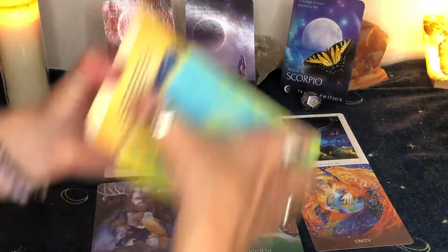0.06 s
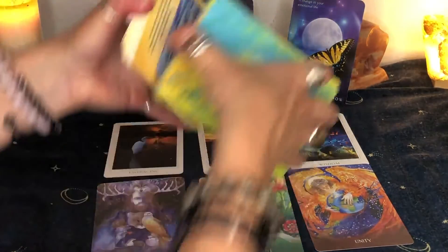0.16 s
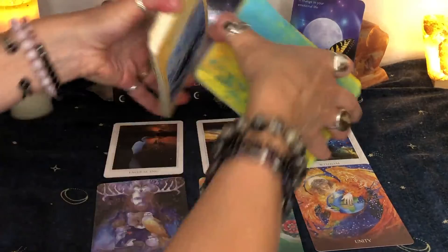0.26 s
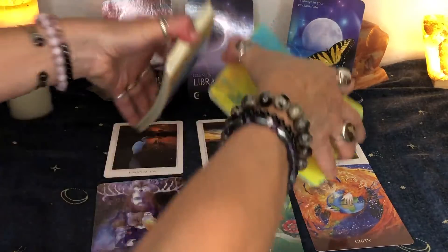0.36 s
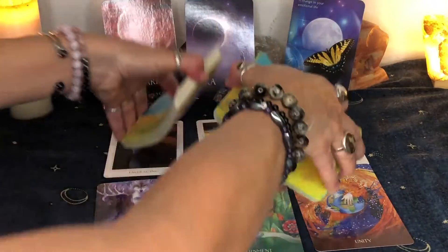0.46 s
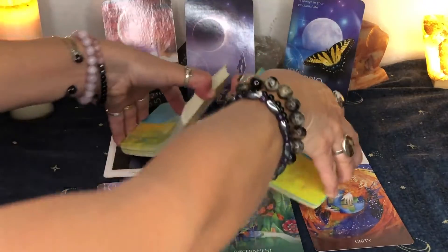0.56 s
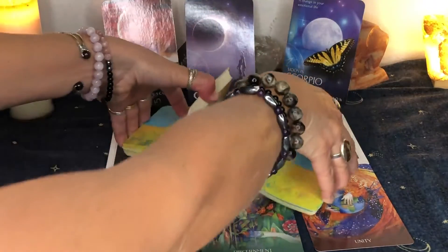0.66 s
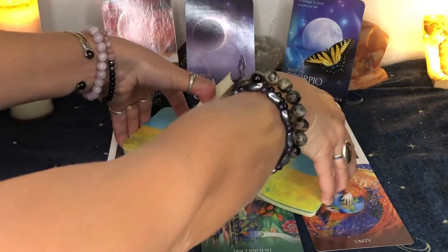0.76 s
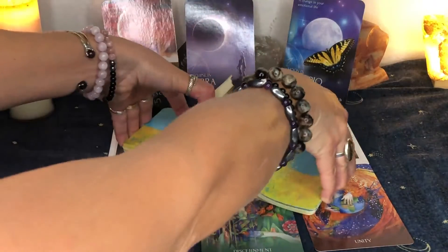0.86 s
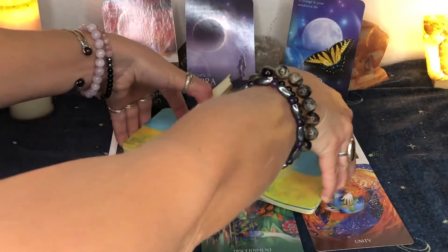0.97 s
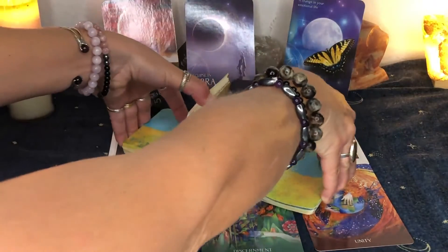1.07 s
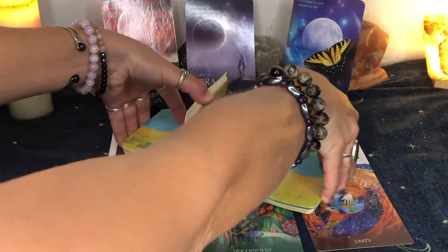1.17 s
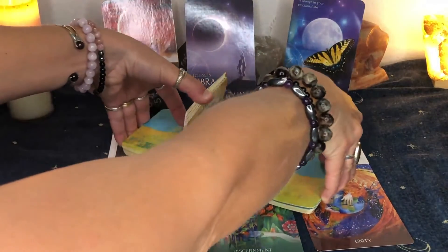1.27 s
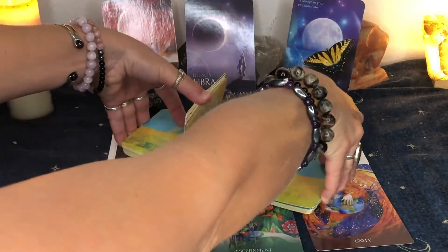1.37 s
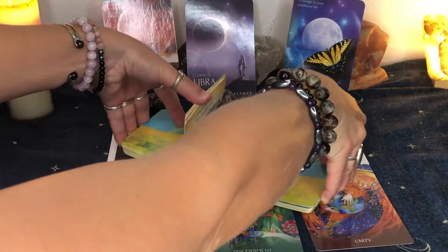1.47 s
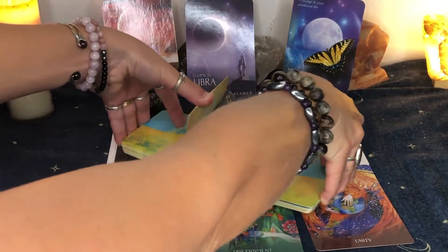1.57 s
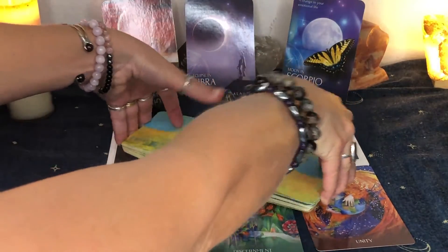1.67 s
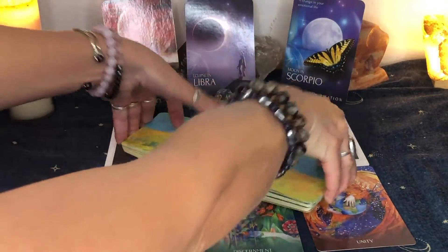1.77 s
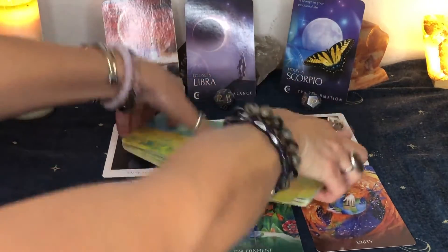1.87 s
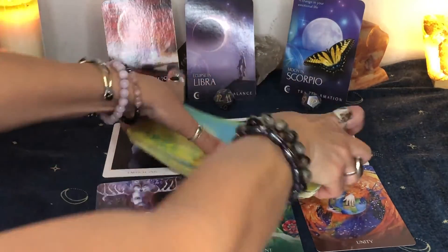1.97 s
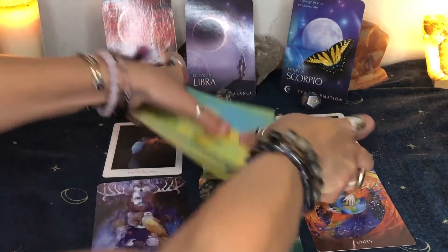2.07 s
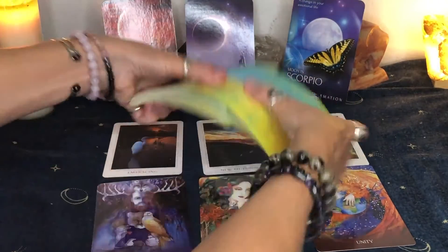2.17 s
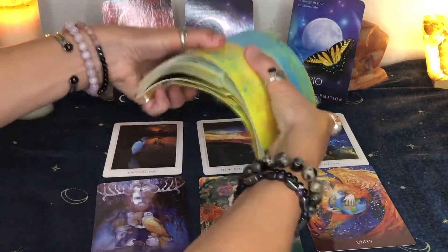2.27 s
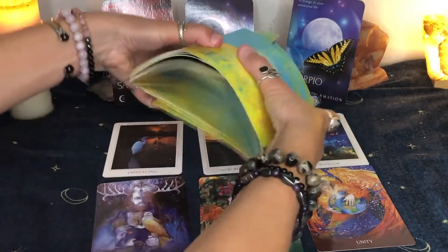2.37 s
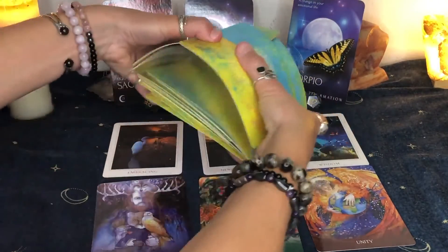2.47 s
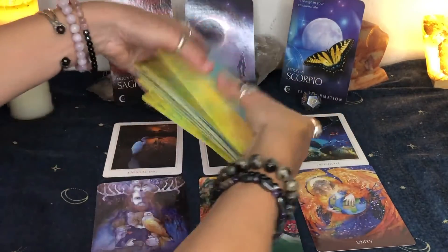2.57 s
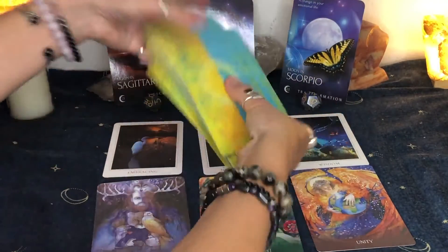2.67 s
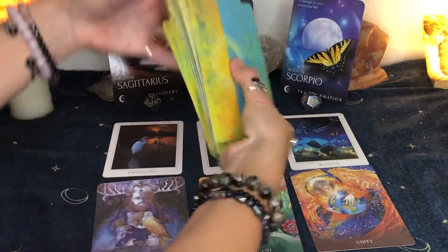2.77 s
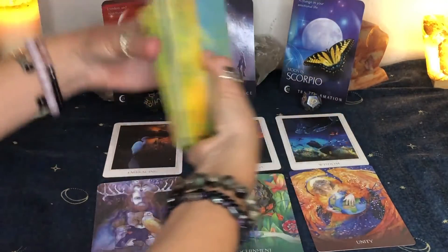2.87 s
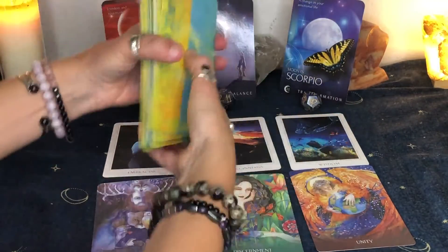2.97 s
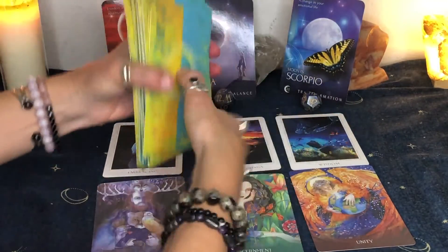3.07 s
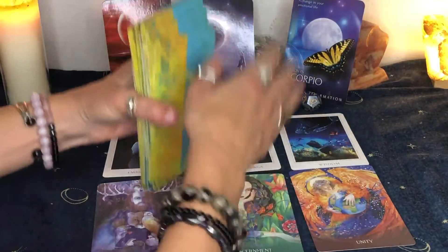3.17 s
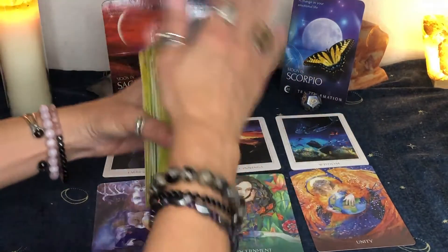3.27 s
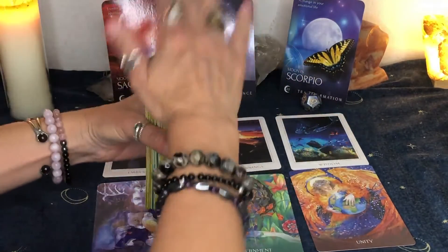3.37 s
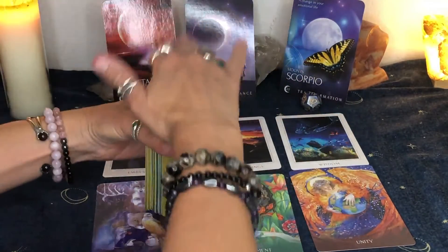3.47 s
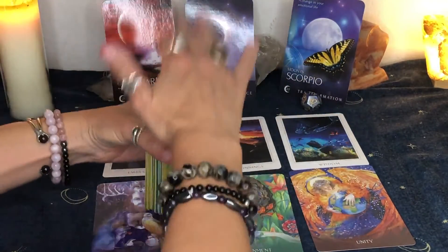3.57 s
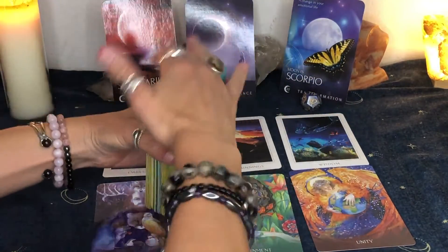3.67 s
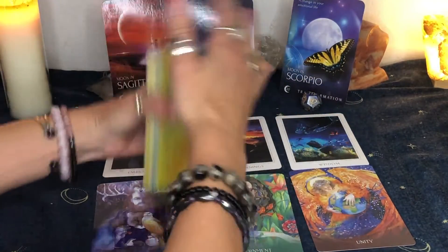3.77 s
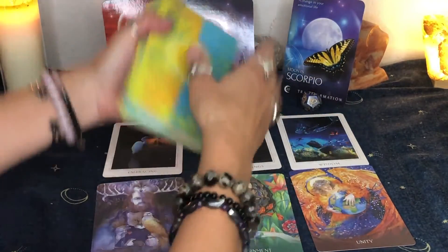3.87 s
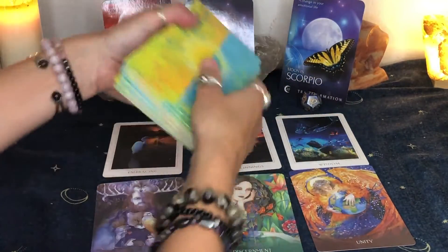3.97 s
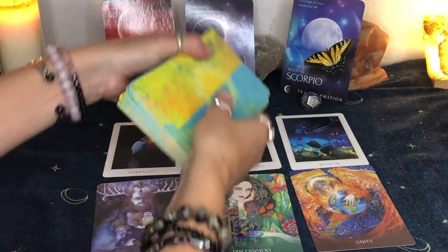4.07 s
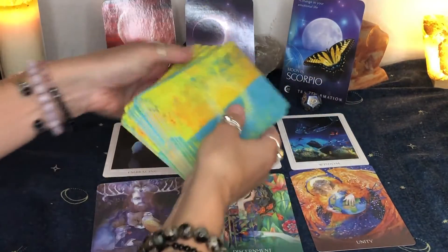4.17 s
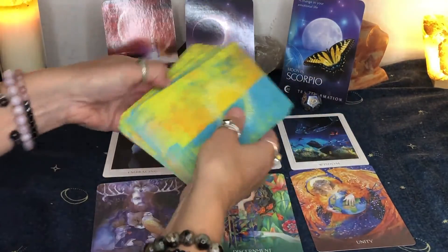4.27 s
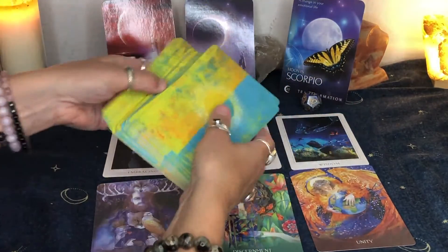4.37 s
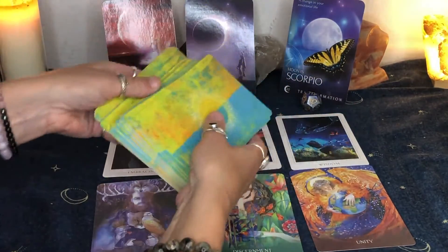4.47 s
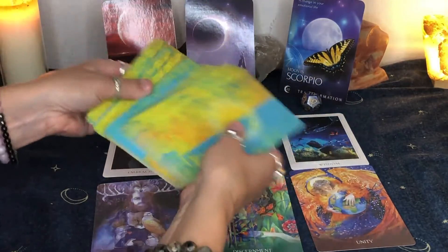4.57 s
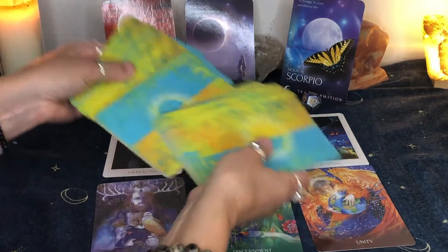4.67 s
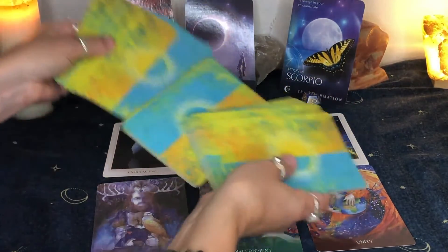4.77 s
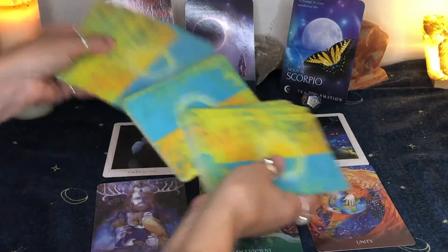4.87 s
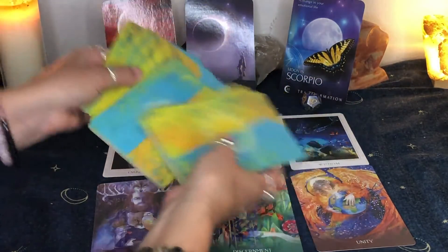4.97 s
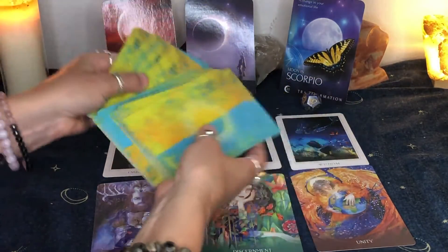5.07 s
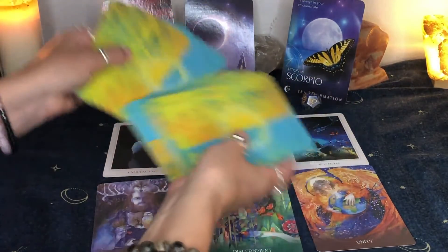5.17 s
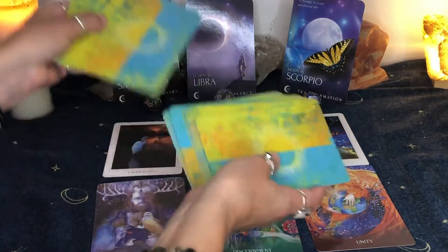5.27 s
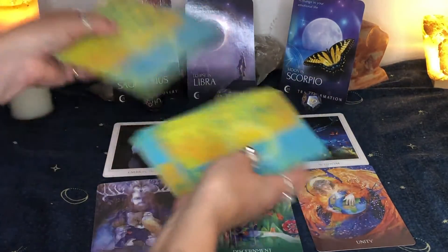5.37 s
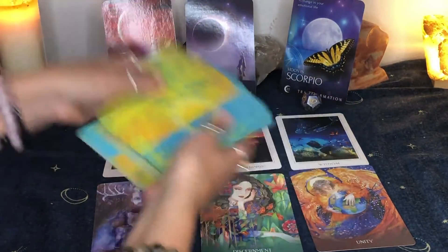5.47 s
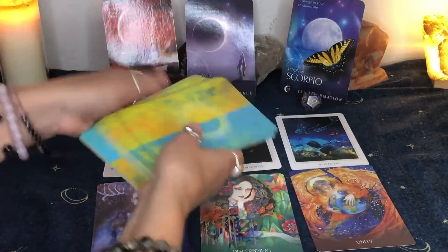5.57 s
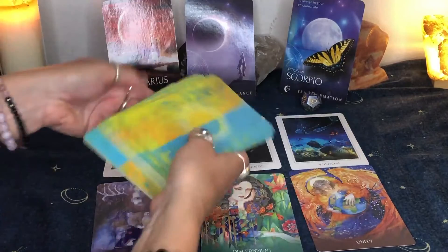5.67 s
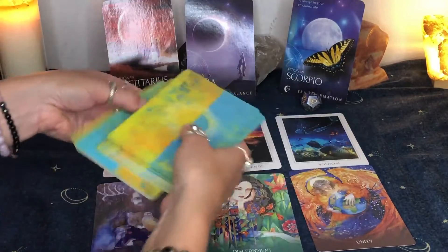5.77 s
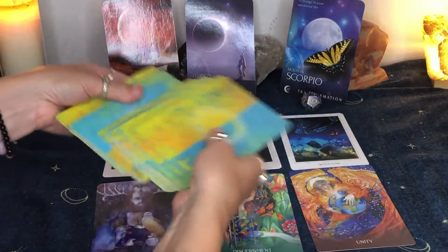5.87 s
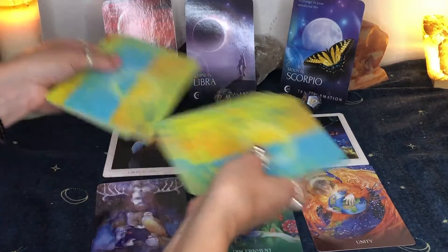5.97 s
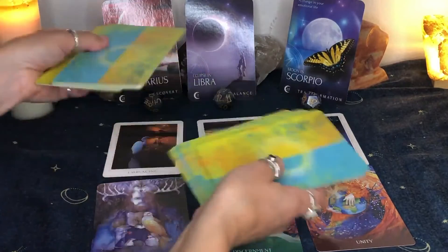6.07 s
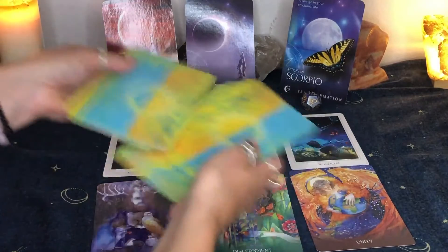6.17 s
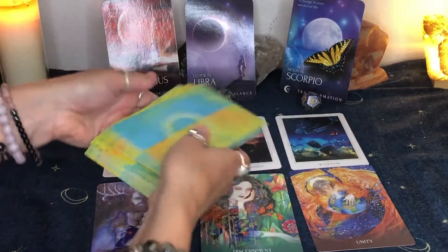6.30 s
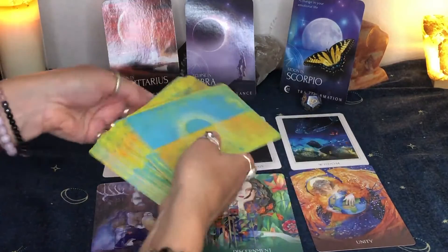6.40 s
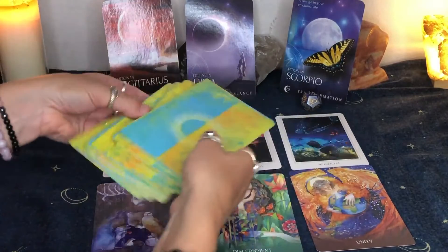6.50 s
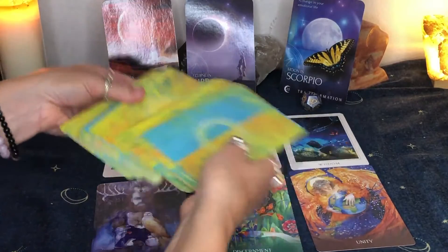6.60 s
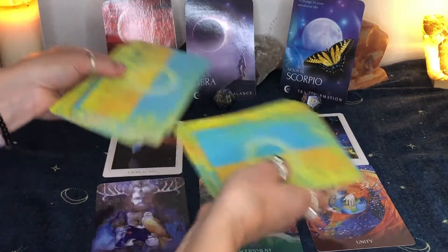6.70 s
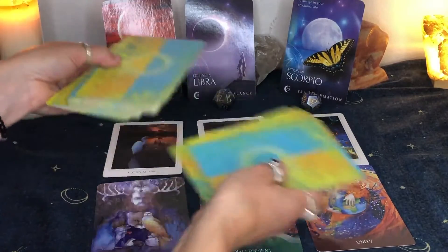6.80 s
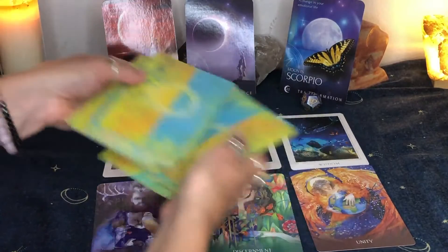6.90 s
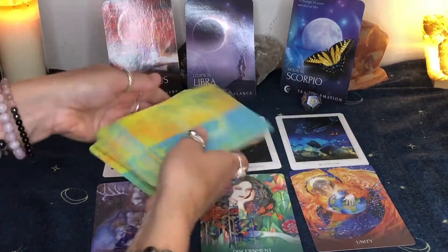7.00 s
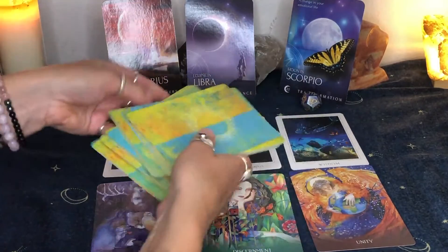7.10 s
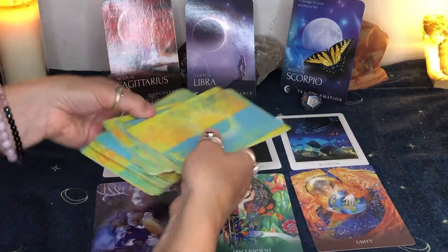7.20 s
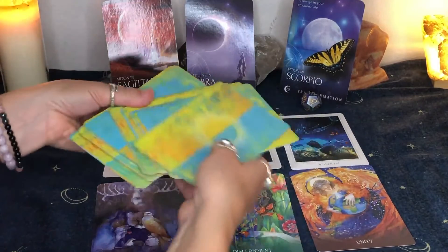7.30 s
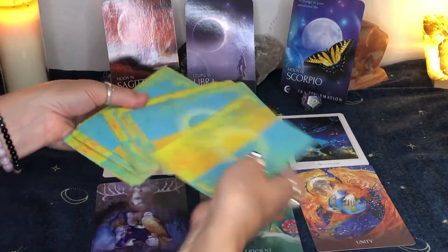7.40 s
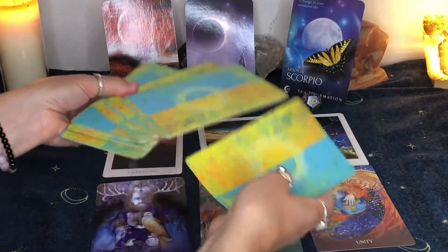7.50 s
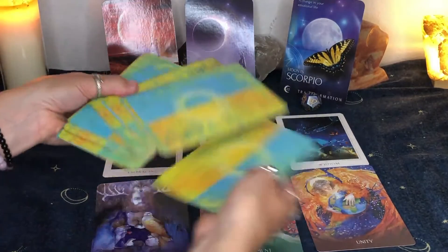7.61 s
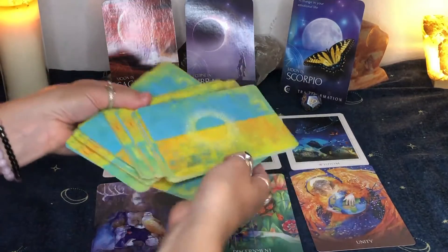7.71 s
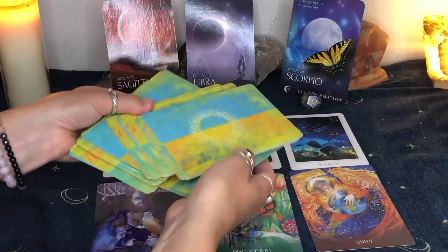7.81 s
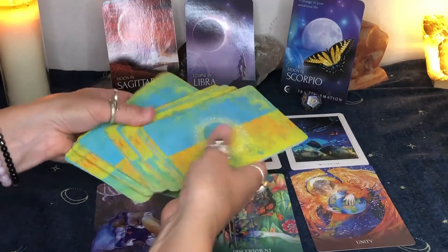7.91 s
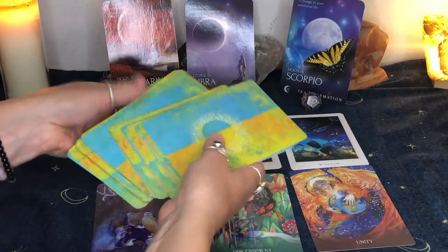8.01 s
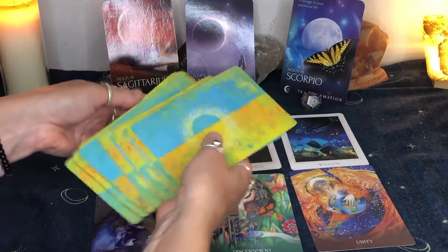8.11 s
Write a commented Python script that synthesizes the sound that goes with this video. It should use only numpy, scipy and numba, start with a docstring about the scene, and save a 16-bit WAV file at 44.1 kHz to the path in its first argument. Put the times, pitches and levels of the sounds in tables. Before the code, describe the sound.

A deck of large stiff cards is riffled in a rapid crackling burst, snapped square with a sharp slap, then shuffled with soft papery swishes indoors.

```python
"""Card edges snap and flap as a deck of large stiff cards is riffled, bridged, slapped square and shuffled.
Each snap is grainy noise that rings the deck and the air in the hands; a soft push thuds the table.
Between snaps, filtered noise makes the hiss, rubs, flutter, ticks and swishes of sliding cards.
A small soft room echoes the snaps; there is also a low rumble, a steady drone
and the dull murmur of air pushed by the cards."""
import sys
import numpy as np
from scipy import signal
from scipy.io import wavfile
from scipy.ndimage import uniform_filter1d
from numba import njit

SR = 44100
rng = np.random.default_rng(int(sys.argv[2]) if len(sys.argv) > 2 else 0)


def file_out(sig):
    """Save sig as 16-bit WAV at sys.argv[1]."""
    # one column per channel
    cols = np.atleast_2d(sig).T
    # limit, then scale
    lim = np.clip(cols, -1, 1)
    pcm = np.round(lim * 32767).astype(np.int16)
    wavfile.write(sys.argv[1], SR, pcm)


N = 359308  # length in samples

# All dB values are settings inside the mix, before the microphone.
# low rumble, and the dull murmur of air pushed by the cards: t/s, rumble level/dB, murmur level/dB
AIR_LEVELS = [(0.0, -38, -61), (0.04, -49.5, -68), (0.63, -45.5, -80), (1.07, -47.5, -50),
              (1.5, -41.5, -67), (1.66, -48.5, -75), (3.27, -51.5, -62.5), (3.45, -42.5, -58),
              (3.79, -49, -70.5), (4.27, -52, -60), (5.83, -49.5, -78), (6.31, -47.5, -71),
              (6.79, -45, -80.5), (8.15, -54, -81)]
# card faces sliding: t/s, hiss level/dB, flutter drive level/dB
SLIDE_LEVELS = [(0.0, -65, -62.5), (0.09, -98, -62), (0.22, -86, -67), (0.43, -82, -75), (0.72, -74.5, -71),
                (0.86, -72, -62), (1.02, -66, -61), (1.47, -61.5, -55.5), (1.66, -66.5, -67),
                (1.86, -70, -66.5), (2.13, -73.5, -64.5), (2.34, -50, -54), (2.43, -55.5, -54.5),
                (2.65, -68, -68), (3.49, -73, -64), (3.63, -80.5, -73.5), (3.88, -72, -74.5),
                (4.11, -71, -64), (4.54, -70, -66), (4.74, -66, -68.5), (5.24, -73.5, -71),
                (5.74, -71, -74.5), (6.13, -76, -70), (6.49, -70, -72), (6.83, -76, -75.5),
                (7.35, -68.5, -68), (7.78, -77, -70.5), (8.15, -66, -66)]
# a fingertip rubs along a card: middle t/s, level/dB, half length/s
FINGER_RUBS = [(0.121, -55.5, 0.13), (0.414, -70, .08), (2.12, -70, .03), (2.65, -55, .015),
               (4.59, -65, 0.042), (4.826, -61.5, 0.012), (5.996, -72, 0.066), (6.387, -77.5, .05),
               (6.703, -66.5, 0.044), (7.267, -74, .045), (7.553, -66, 0.032), (7.897, -66.5, 0.052),
               (8.103, -70.5, 0.057)]
# brief dips in the level of the sliding: middle t/s, level change/dB, half length/s
SLIDE_DIPS = [(.31, -7, 0.035), (.56, -2, .05), (2.02, -5.5, 0.033), (2.777, -4.5, 0.048), (3.224, -4, .04),
              (3.76, -6, .11), (5.347, -1, 0.026), (5.6, -1.5, .04), (6.06, -3, 0.038), (6.32, -4, .03),
              (6.805, -4, .05), (7.038, -1.5, .04), (7.174, -5.5, 0.02), (7.32, -5, 0.019),
              (7.61, -6, 0.013), (7.772, -4.5, 0.053), (7.98, -4, .02)]
# swishes of cards sliding or cascading together: peak t/s, level/dB, centre f/Hz, half length/s
CARD_SWISHES = [(0.14, -69.5, 4840, 0.17), (2.095, -56, 4970, 0.024), (2.212, -57, 7900, .03),
                (2.296, -43.5, 7300, 0.035), (2.388, -50, 7000, 0.055), (2.493, -46.5, 6300, 0.056),
                (2.957, -59, 4470, 0.038), (4.043, -67.5, 7060, .03), (4.22, -69.5, 8000, 0.049),
                (4.562, -62, 3220, 0.017), (4.41, -67, 11000, .008), (4.618, -69, 4020, .025),
                (4.69, -65, 8000, .03), (4.88, -63, 8000, 0.022), (4.97, -61, 5000, .02),
                (4.757, -51, 9300, 0.021), (4.933, -49.5, 8600, 0.016), (5.157, -50.5, 9400, 0.035),
                (5.312, -70, 8000, .02), (5.485, -51, 9000, 0.016), (5.857, -65.5, 4840, 0.018),
                (5.918, -60.5, 8040, 0.034), (6.252, -59, 8250, 0.025), (6.649, -49.5, 10030, 0.037),
                (6.932, -56.5, 7000, 0.037), (7.1, -69, 8800, .015), (7.36, -68, 5500, .02),
                (7.425, -52, 6050, 0.022), (7.672, -56.5, 4960, 0.03), (7.885, -59, 3870, 0.051),
                (8.039, -60.5, 3260, 0.028)]
# resonances of the deck: f/Hz, width/Hz, level/dB
DECK_MODES = [(533, 210, -1), (858, 130, 6.5), (1287, 412, 0), (2300, 760, -10), (3106, 900, -21),
              (4350, 320, -18)]
# resonances of the table: f/Hz, width/Hz, level/dB
TABLE_MODES = [(77, 22, -8.5), (135.6, 27, 1), (313.2, 75, 4.5)]
# how the deck is held from each time on:
# t/s, table push level re the flap drive/dB, air pocket level/dB, bright rasp level/dB
DECK_HOLDS = [(0, -21.5, 5, 0), (1.34, -16.5, 3, -1), (1.58, -17.5, 9, 3), (1.7, -7.5, 7, -5),
              (2.0, -19, 13, -3), (2.6, -18, 3, 2), (3.2, -9.5, 9.5, -17), (3.37, -14, 7, -5),
              (3.5, -6.5, 2, -2.5), (3.8, -25.5, 3.5, 6.5), (5.2, -24, 5.5, -1.5), (5.4, -19, 2, 4.5),
              (5.45, -25.5, 4, 5), (6.1, -22.5, 5.5, 6), (6.6, -28, 0, 2), (7.1, -20, 10, 0.5)]
# card edges snapping or landing:
# t/s, flap drive level/dB, air pocket f/Hz, scuff level re the flap drive/dB, scuff f/Hz, flap fade/s
EDGE_SNAPS = [(0.337, -70.5, 581, 11, 2890, 0.014), (0.675, -44.5, 1430, -9, 5030, 0.003),
              (0.696, -28.5, 1370, -13, 4380, 0.006), (0.772, -29.5, 1630, -6, 3930, 0.0069),
              (0.804, -25.5, 845, -20, 3890, 0.0055), (0.836, -35.5, 1370, -6, 3280, 0.008),
              (0.861, -16.5, 780, -15.5, 3900, 0.008), (0.871, -17.5, 910, -9, 4800, 0.0033),
              (0.954, -39, 880, -11, 7860, 0.0027), (0.977, -20.5, 840, -12, 3860, 0.0064),
              (1.024, -30, 1400, -13, 4250, 0.0061), (1.053, -21, 1380, -24, 4440, 0.0074),
              (1.063, -22.5, 1410, -4.5, 4470, 0.0056), (1.088, -21, 1200, -7.5, 4470, 0.004),
              (1.126, -44, 1420, -8, 3930, 0.017), (1.135, -15.5, 980, -4.5, 4100, 0.0053),
              (1.183, -24.5, 2100, -16.5, 7070, 0.012), (1.192, -20.5, 1350, -23, 4330, 0.0088),
              (1.257, -16, 810, -21.5, 4540, 0.0055), (1.325, -19.5, 790, -22, 3360, 0.0074),
              (1.353, -32.5, 830, -7, 4390, 0.0034), (1.368, -19, 820, -28, 3050, 0.0063),
              (1.38, -31, 1250, -9.5, 8600, 0.014), (1.393, -22, 800, -13, 2920, 0.008),
              (1.42, -18.5, 1250, -18, 4000, 0.0075), (1.485, -47, 1420, -15, 3710, 0.008),
              (1.502, -25.5, 923, -15.5, 7800, 0.0083), (1.509, -38, 1210, -2, 3960, 0.016),
              (1.526, -18.5, 1430, -15, 3540, 0.0097), (1.556, -23, 1320, -11, 3970, 0.0053),
              (1.574, -25, 859, -17.5, 5190, 0.01), (1.591, -24, 840, -12.5, 2600, 0.015),
              (1.612, -23.5, 1440, -12.5, 8200, 0.0089), (1.633, -27, 1350, -4.5, 4540, 0.0059),
              (1.786, -50.5, 1020, -8, 4950, 0.008), (1.803, -50.5, 1360, -12, 2690, 0.0092),
              (1.873, -48.5, 1280, -15, 6200, 0.016), (2.077, -57, 1810, 8, 6700, 0.0085),
              (2.128, -56.5, 1340, 1, 3170, 0.024), (2.228, -52, 1660, 3, 3500, 0.019),
              (2.344, -40.5, 1590, -3, 3230, 0.014), (2.365, -37.5, 676, -7.5, 6210, 0.013),
              (2.378, -27.5, 730, -12, 3150, 0.015), (2.395, -25.5, 810, -14, 5560, 0.011),
              (2.422, -19, 869, -14.5, 3460, 0.0063), (2.433, -34, 1510, -6, 3030, 0.013),
              (2.484, -36.5, 1530, -7, 7660, 0.0086), (2.497, -25.5, 686, -6, 2820, 0.0067),
              (2.518, -30.5, 821, -7, 5350, 0.011), (2.531, -32.5, 996, -8, 2900, 0.011),
              (2.546, -27, 790, -30, 3200, 0.0065), (2.618, -41.5, 810, -7.5, 2980, 0.011),
              (2.65, -52, 815, -6, 2800, 0.0027), (2.694, -60, 576, 3, 2790, 0.0038),
              (2.744, -58.5, 503, 10, 10600, 0.004), (2.943, -51.5, 538, 3, 4000, 0.0076),
              (3.028, -53, 501, -1.5, 5140, 0.0075), (3.061, -52, 732, -8, 6190, 0.0054),
              (3.097, -52, 560, -5.5, 3670, 0.0075), (3.278, -46, 660, 0, 2600, 0.0046),
              (3.302, -39, 729, 4.5, 3250, 0.0027), (3.336, -43.5, 815, 2, 4100, 0.0039),
              (3.351, -36, 1150, 8, 3420, 0.0047), (3.378, -32.5, 635, -3, 2600, 0.014),
              (3.397, -30, 1130, 7, 3900, 0.0044), (3.407, -8.5, 1230, -6, 3920, 0.0048),
              (3.412, -9, 710, -31, 3670, 0.0069), (3.58, -23, 636, -4, 3940, 0.004),
              (3.881, -53, 884, -4, 8250, 0.019), (4.227, -52.5, 670, -3.5, 9090, 0.015),
              (4.56, -50, 614, -15, 3780, 0.02), (4.819, -54.5, 851, -12, 2630, 0.0063),
              (4.922, -55, 1260, 4.5, 8690, 0.0093), (5.239, -40.5, 570, -3.5, 3720, 0.0057),
              (5.287, -52, 616, -15, 2750, 0.0072), (5.299, -58.5, 1010, -2.5, 8920, 0.0059),
              (5.392, -51, 853, -12, 3380, 0.0068), (5.412, -30.5, 821, -6, 3520, 0.0075),
              (5.461, -42, 840, -8, 3190, 0.015), (5.478, -40, 875, -4, 10300, 0.0095),
              (5.719, -53, 1220, -7, 3430, 0.01), (5.84, -47.5, 573, -9, 3730, 0.0099),
              (5.977, -46.5, 832, -12, 3680, 0.0092), (6.012, -46, 764, -23, 2600, 0.013),
              (6.157, -34, 594, -12, 4100, 0.011), (6.212, -44.5, 1240, -2.5, 9700, 0.0064),
              (6.237, -33.5, 840, -12.5, 2900, 0.012), (6.397, -54, 2340, -10, 2690, 0.0073),
              (6.422, -60, 511, -1, 2750, 0.0039), (6.693, -42, 800, 0, 3520, 0.0064),
              (6.859, -29.5, 815, -11, 2600, 0.0077), (6.876, -50, 2360, 8, 3340, 0.012),
              (6.932, -45.5, 820, -7.5, 3580, 0.015), (6.947, -42.5, 798, -16, 3600, 0.017),
              (7.092, -66.5, 501, 5.5, 8910, 0.0085), (7.148, -52.5, 817, -21.5, 3850, 0.0049),
              (7.25, -53, 833, -14.5, 9320, 0.017), (7.371, -55, 1470, -1, 3320, 0.018),
              (7.421, -45, 700, -12, 3490, 0.02), (7.459, -43, 2090, 0, 3000, 0.0066),
              (7.63, -41, 842, -17, 3380, 0.0042), (7.641, -39.5, 780, -12, 4190, 0.011)]

ROOM_T60_S, ROOM_DB, ROOM_HZ = 0.17, -16, 2500  # time to fade by 60 dB, echo level, echo bandwidth
TICKS_PER_S, TICK_S = 22, .0015  # average rate, fade time
TICK_DB, TICK_SPREAD_DB = 5, 2.5  # lowest drive re the hiss, average random extra
RUB_DB = -3.5  # steady rub re the mean of the hiss and flutter settings
HISS_HZ, HISS_WANDER_OCT = 6000, .15  # middle of the hiss, typical wander in octaves
SWISH_SHAPE = 1.46  # 2 = rounded bell, 1 = pointed with long skirts
SCUFF_LONGER = 1.044  # scuff fade time over flap fade time
TOP_HZ = 16000  # the microphone's upper limit


def undb(db):
    """Turn a level in dB into a gain."""
    return 10 ** (np.asarray(db) / 20)


def level(x, db):
    """Scale a sound to a chosen rms (average) level in dB."""
    return x * undb(db) / np.sqrt(np.mean(x ** 2))


def curves(table):
    """Join the points of each table column with straight lines, sample by sample."""
    times_s, *columns = np.transpose(table)
    return [np.interp(np.arange(N) / SR, times_s, column) for column in columns]


@njit
def moving_band(x, hz, q):
    """Band-pass filter whose centre may move; gain 1 at the centre, narrower for larger q."""
    y, band_state, low_state = np.empty(len(x)), 0., 0.
    for i in range(len(x)):
        g = np.tan(np.pi * hz[i] / SR)
        v = (band_state + g * (x[i] - low_state)) / (1 + g * (g + 1 / q))
        band_state = 2 * v - band_state
        low_state = low_state + 2 * g * v
        y[i] = v / q
    return y


def band(x, hz, width_hz):
    """Band-pass filter with a fixed centre."""
    return moving_band(x + 1e-18, np.full(N, 1. * hz), hz / width_hz)


def ring(x, modes):
    """Add up a body's resonances, with alternating signs."""
    total = 0
    for k, (hz, width_hz, db) in enumerate(modes):
        total = total + (-1) ** k * undb(db) * band(x, hz, width_hz)
    return total


def walk(rate):
    """Smooth random wander: levels held 1 / rate s and averaged twice; spread near 1."""
    k = int(SR / rate)
    steps = np.repeat(rng.standard_normal(N // k + 1), k)
    return 1.39 * uniform_filter1d(uniform_filter1d(steps, k), k)[:N]


def grit(spread_db, rate):
    """Noise whose size wanders, as tiny contacts make and break; rms 1."""
    return level(rng.standard_normal(N) * undb(spread_db * walk(rate)), 0)


def air():
    """A rumble at hearing's lower edge, a steady low drone and the dull murmur of air pushed by the cards."""
    rumble_db, murmur_db = curves(AIR_LEVELS)
    rumble = rng.standard_normal(N)
    for _ in range(3):
        rumble = band(rumble, 13, 30)
    rumble = level(rumble, 0)
    drone = level(band(rng.standard_normal(N), 55, 68), -68.0)
    murmur = level(band(rng.standard_normal(N), 300, 210), 0)
    murmur = murmur * undb(1.8 * walk(19))
    return rumble * undb(rumble_db) + drone + murmur * undb(murmur_db)


def room(x):
    """Add dense dull echoes: fading noise that sets in after 4 ms."""
    t = np.arange(N) / SR
    fade = np.exp(-np.log(1000) * t / ROOM_T60_S) * (t > .004)
    echoes = band(rng.standard_normal(N), ROOM_HZ / 3, ROOM_HZ) * fade
    echoes = echoes[:SR] / np.sqrt(np.sum(echoes ** 2))
    return x + undb(ROOM_DB) * signal.fftconvolve(x, echoes)[:N]


def ticks(hiss_db):
    """Card corners catch now and then: short fading bursts of thin bright noise."""
    sizes = undb(TICK_SPREAD_DB * rng.exponential(size=N))
    catches = (rng.random(N) < TICKS_PER_S / SR) * sizes
    shape = signal.lfilter([1], [1, -np.exp(-1 / (TICK_S * SR))], catches)
    bright = level(band(rng.standard_normal(N), 12000, 9000), 0)
    return shape * bright * undb(hiss_db + TICK_DB)


def bumps(table):
    """Flat-topped bumps from rows of middle time, level and half length: pairs of level and shape."""
    t = np.arange(N) / SR
    return [(db, np.exp(-((t - s) / half_s) ** 4)) for s, db, half_s in table]


def hiss_of_faces():
    """Coated faces slide: fine noise round a wandering centre, plus a bright band; rms 1."""
    centre_hz = HISS_HZ * 2 ** (HISS_WANDER_OCT * walk(22))
    fine = grit(0.58, 270)
    body = moving_band(fine, np.clip(centre_hz, 1500, 14000), 0.92)
    return level(body + 0.59 * band(fine, 12000, 11000), 0)


def fingertip_rub():
    """Skin drags on a card: coarse mid-pitched noise with an uneven level."""
    skin = grit(1.5, 200)
    narrow = band(band(skin, 2600, 1300), 2600, 1300)
    rub = level(narrow + 0.45 * band(skin, 2200, 3500), 0)
    return rub * undb(1.5 * walk(30))


def slide():
    """Sliding cards mix hiss, rub and ticks with a coarse flutter that the deck colours."""
    hiss_db, flutter_db = curves(SLIDE_LEVELS)
    steady_rub = undb((hiss_db + flutter_db) / 2 + RUB_DB)
    strokes = steady_rub + sum(undb(db) * shape for db, shape in bumps(FINGER_RUBS))
    loose = np.clip((flutter_db + 68.5) / 12, .25, 1)  # a stronger flutter is grainier
    flutter = ring(grit(2.0 * loose, 200), DECK_MODES) * undb(12.5 - 3 * loose)
    flutter = flutter * undb(flutter_db + 3.5 * loose * walk(30))
    catch = walk(40)  # hiss and rub catch and let go together
    hiss = hiss_of_faces() * undb(hiss_db + 0.7 * catch)
    rub = fingertip_rub() * strokes * undb(1.2 * catch)
    pressure_db = 2.1 * walk(6.5)  # the hands ease and press
    dip_db = sum(db * shape for db, shape in bumps(SLIDE_DIPS))
    return undb(pressure_db + dip_db) * (hiss + rub + flutter + ticks(hiss_db))


def swishes():
    """Cards slide or cascade together: gritty noise round its own centre swells and fades."""
    t, total = np.arange(N) / SR, 0
    faces = grit(2.0, 300) * undb(1.3 * walk(60))
    for s, db, hz, half_s in CARD_SWISHES:
        swell = np.exp(-np.abs((t - s) / half_s) ** SWISH_SHAPE)
        hiss = level(band(band(faces, hz, 1.9 * hz), hz, 1.9 * hz), 0)
        total = total + undb(db) * swell * hiss
    return total


def snaps():
    """Each gritty flap rings the deck and an air pocket, scuffs along the edge and shoves the table."""
    flap, scuff, shove = np.zeros((3, N))
    pocket_hz, edge_hz, bright_db, pocket_db = np.ones((4, N))
    t = np.arange(SR // 8) / SR
    for s, db, hz, scuff_db, scuff_hz, flap_s in EDGE_SNAPS:
        _, thud_db, cup_db, rasp_db = [hold for hold in DECK_HOLDS if hold[0] <= s][-1]
        scuff_s = SCUFF_LONGER * flap_s
        start = int(s * SR)
        now = slice(start, start + len(t))
        rise = 1 - np.exp(-t / 0.00037)
        # the card keeps rattling while it unbends, then stops short
        flap[now] += undb(db) * rise * np.exp(-(t / flap_s) ** 1.4)
        scuff[now] += undb(db + scuff_db) * rise * np.exp(-(t / scuff_s) ** 0.8)
        # soft push through the cloth
        shove[now] += undb(db + thud_db) * (t / 0.0016) * np.exp(-t / 0.0016)
        # these settings hold until the next snap
        pocket_hz[start:], pocket_db[start:] = hz, cup_db
        edge_hz[start:], bright_db[start:] = scuff_hz, rasp_db
    first_contact = np.maximum(np.diff(flap, prepend=0), 0)  # only the rising part, without grit
    blows = flap * grit(2.0, 500) + undb(21) * first_contact
    deck = undb(6) * ring(blows, DECK_MODES)
    pocket = undb(pocket_db) * moving_band(blows, pocket_hz, 4.2)
    rasp = scuff * grit(2.9, 900)
    edge = undb(6) * moving_band(moving_band(rasp, edge_hz, 1.02), edge_hz, 1.02)
    bright = undb(bright_db) * band(rasp, 7500, 9800)
    thud = undb(26.0) * ring(shove, TABLE_MODES)
    return deck + pocket + edge + bright + thud


def scene():
    """Mix the snaps with their room echoes, the sliding, the swishes and the air."""
    return (room(snaps()) + slide() + swishes() + air())[None]


def record(dry):
    """The microphone rounds the loudest peaks and cuts the top."""
    rounded = np.tanh(1.726 * dry) / 1.972
    low_pass = signal.ellip(10, .2, 70, TOP_HZ, fs=SR, output="sos")
    return signal.sosfilt(low_pass, rounded)


dry = scene()
out = record(dry)
file_out(out)
```